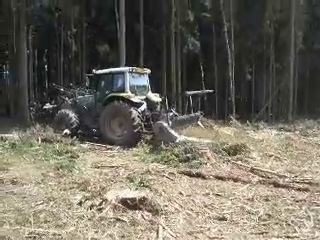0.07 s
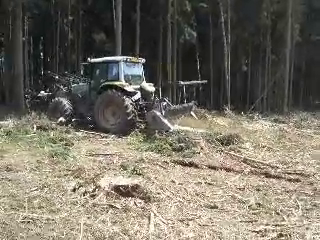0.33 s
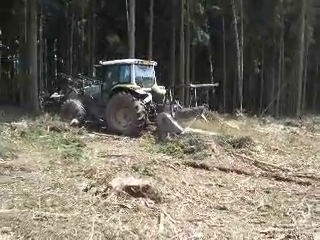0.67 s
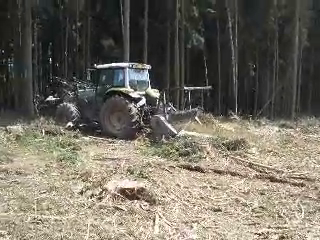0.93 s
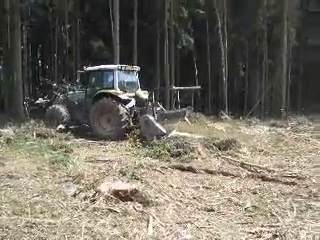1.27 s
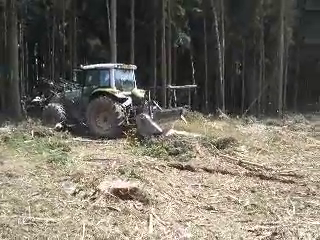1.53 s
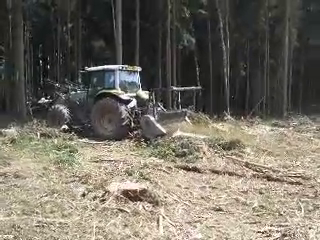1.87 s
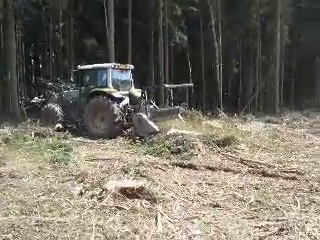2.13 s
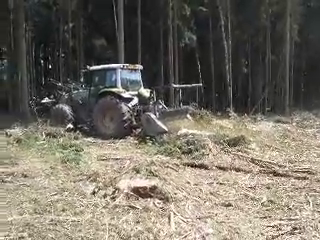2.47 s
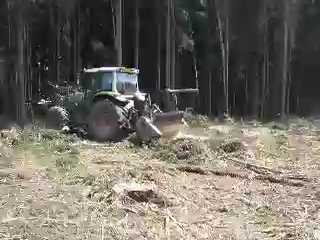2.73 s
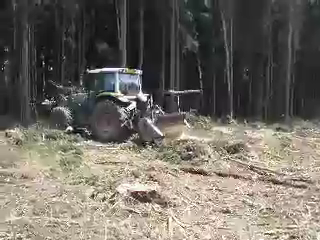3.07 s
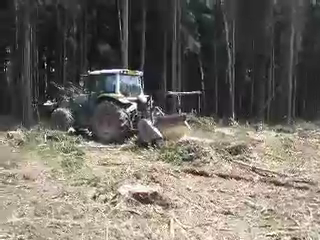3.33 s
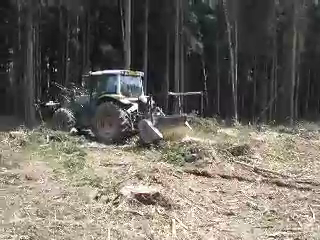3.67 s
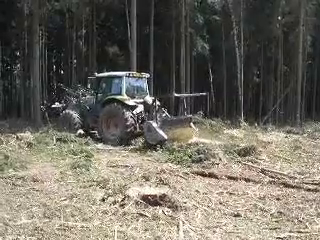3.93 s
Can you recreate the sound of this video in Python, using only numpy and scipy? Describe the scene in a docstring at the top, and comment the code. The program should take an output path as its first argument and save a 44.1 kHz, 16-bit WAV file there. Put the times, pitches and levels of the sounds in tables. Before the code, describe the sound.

A tractor-driven mulcher shreds brushwood throughout, some way off in a clearing: diesel roar, rotor drone and dense splintering. A thick branch snaps at 0.7 seconds; the engine sags slightly until 1.7 and recovers by 3. More loud snaps come at 2.2 and 2.9 seconds. From about 2.5 to 4 seconds the steel hood rings in surges. A narrow-sounding microphone clips the loudest cracks.

```python
"""A tractor drives a forestry mulcher through brushwood, some way off in a clearing.
From the start the six-cylinder diesel roars and the rotor drones, its teeth shredding wood.
A thick branch snaps at 0.7 s; the engine sags under load until 1.7 s and recovers by 3 s.
More loud snaps come at 2.2 and 2.9 s, and towards the end the steel hood rings in surges.
Throughout, a narrow-band camera microphone clips the loudest cracks and ducks after them."""
import sys
import numpy as np
from scipy import signal
from scipy.fft import rfft, irfft
from scipy.io import wavfile

SR = 44100
rng = np.random.default_rng(int(sys.argv[2]) if len(sys.argv) > 2 else 0)


def generate_wav(sig):
    """Save sig (samples, or channels by samples) to the path in sys.argv[1] as 16-bit PCM at SR."""
    pcm = np.round(np.clip(np.atleast_2d(sig).T, -1, 1) * 32767).astype(np.int16)
    wavfile.write(sys.argv[1], SR, pcm)


N = 176400
TIME = np.arange(N) / SR
FREQ_HZ = np.fft.rfftfreq(N, 1 / SR)
EVENT_TIME = TIME[:4096]


def amp(db):
    """Decibels to gain."""
    return 10 ** (np.asarray(db) / 20)


def unit(x):
    """Scales to rms 1."""
    return x / np.sqrt(np.mean(x ** 2) + 1e-20)


def curve(points):
    """Breakpoints to a value per sample."""
    return np.interp(TIME, *np.transpose(points))


def gain_at(spectrum, hz):
    """Gain of a dB spectrum, interpolated in log frequency."""
    f, db = np.transpose(spectrum)
    return amp(np.interp(np.log(hz + 1), np.log(f + 1), db))


def colour(x, spectrum):
    """Filters by a dB spectrum."""
    return irfft(rfft(x) * gain_at(spectrum, FREQ_HZ), N)


def drift(hz):
    """Random wander up to about this rate; rms 1."""
    lowpass = np.exp(-(FREQ_HZ / hz) ** 2) * (FREQ_HZ > 0)
    return unit(irfft(rfft(rng.standard_normal(N)) * lowpass, N))


def add(mix, start_s, sound):
    """Mixes a sound in at a time."""
    part = mix[max(round(start_s * SR), 0):][:len(sound)]
    part += sound[:len(part)]


def partial(cycles, waver_db, waver_rad):
    """A tone whose level and phase wander on the way through the clearing; rms 1."""
    knots_s = np.linspace(0, TIME[-1], 400)
    level, phase = (np.interp(TIME, knots_s, signal.resample(r, 400))
                    for r in rng.standard_normal((2, 24)))
    return unit(amp(waver_db * level) * np.sin(2 * np.pi * (cycles + rng.random()) + waver_rad * phase))


# Shredded wood spectrum: f/Hz, relative density/dB
SHRED_SPECTRUM = [(60, -49.5), (400, -21.5), (650, -9.5), (930, -8), (1180, -2), (1500, -2), (1800, 2),
                  (2150, -1), (2450, 0), (2700, -2.5), (3100, -3), (3300, -3), (3650, -2.5), (4500, -7.5),
                  (5200, -50.5)]
# Shredding envelope: t/s, level/dB
SHRED_LEVEL = [(0, -22.5), (.3, -21), (.8, -22), (1.4, -23), (1.75, -22), (2, -21), (2.3, -22.5),
               (2.85, -20), (3.1, -21.5), (3.4, -22.5), (3.75, -23), (4, -21)]


def shredding(rotor_turns, splinters_per_s=1000, splinter_share=0.74, echo_s=0.0027, echo_db=-1):
    """Teeth tear wood in uneven bites: splinters and chip hiss, which also ring the hood."""
    bite = amp(1.4 * drift(hz=35.4) + 0.66 * drift(hz=2) + 0.75 * np.cos(2 * np.pi * rotor_turns))
    size_db = 3 * np.minimum(rng.exponential(1, N), 2.6)
    clicks = amp(size_db) * rng.choice([-1, 1], N) * (rng.random(N) < splinters_per_s / SR)
    # early echoes off the machine and the ground
    echo_envelope = np.sqrt(abs(signal.fftconvolve(clicks ** 2, np.exp(-EVENT_TIME / echo_s))[:N]))
    splinters = unit(unit(clicks) + amp(echo_db) * unit(echo_envelope * rng.standard_normal(N)))
    hiss = rng.standard_normal(N)
    chips = np.sqrt(splinter_share) * splinters + np.sqrt(1 - splinter_share) * hiss
    wood = unit(colour(bite * chips, SHRED_SPECTRUM))
    wood = 4 * np.tanh(wood / 4)  # soft limit at 4 x rms
    return amp(curve(SHRED_LEVEL)) * wood + hood(bite * echo_envelope)


# Steel hood modes: f/Hz, bandwidth/Hz, relative level/dB
HOOD_MODES = [(1260, 84, 0), (1660, 120, -4.5), (1894, 57, 3), (1990, 70, 0.5), (2460, 55, -5)]
# Ringing envelope: t/s, level/dB
HOOD_LEVEL = [(0, -35.5), (1, -31.5), (2.1, -30.5), (2.35, -31), (2.48, -24), (2.65, -32), (2.84, -20),
              (2.95, -41), (3.4, -21.5), (3.6, -34.5), (3.78, -22), (4, -32)]


def hood(impacts):
    """Flying chips excite the damped modes of the steel hood."""
    t, ringing = EVENT_TIME, 0
    for hz, width_hz, db in HOOD_MODES:
        mode = np.sqrt(width_hz) * np.exp(-np.pi * width_hz * t) * np.cos(2 * np.pi * hz * t)
        ringing += amp(db) * signal.fftconvolve(impacts * rng.standard_normal(N), mode)[:N]
    return amp(curve(HOOD_LEVEL)) * unit(ringing)


# Breaks: t/s, splintering level/dB, snap level/dB, f/Hz, splintering decay/s
CRACKS = [(0.315, -16.5, -19.5, 2300, 0.0062), (0.7111, -7, 1, 2570, 0.0059),
          (0.714, -8.5, -4, 2420, 0.005), (.719, -5, -12.5, 2400, 0.0027), (1.046, -14.5, -14, 1805, .008),
          (1.127, -18, -14, 2000, .006), (1.414, -14.5, -15, 2620, 0.0045), (2.127, -15, -16, 2820, 0.0046),
          (2.1773, -17, -1.5, 2710, 0.021), (2.183, -9.5, -10.5, 2580, .006),
          (2.878, -7.5, 1, 2540, 0.0048), (2.882, -12.5, -7.5, 2380, 0.0055),
          (3.151, -14, -20, 2290, 0.0073), (3.845, -13.5, -14.5, 1900, .008)]


def thick_branches(snap_s=0.00026, rise_s=0.0013):
    """Each branch breaks with a sharp snap and a decaying burst of splintering."""
    out, t = np.zeros(N), EVENT_TIME
    for start_s, burst_db, snap_db, hz, decay_s in CRACKS:
        snap = t / snap_s * np.exp(1 - t / snap_s) * np.sin(2 * np.pi * hz * t)
        burst = splintering(hz) * np.minimum(t / rise_s, 1) * np.exp(-t / decay_s)
        add(out, start_s, amp(snap_db) * snap + amp(burst_db) * burst)
    return out


# Crunches: peak t/s, level/dB, f/Hz, half length/s
CRUNCHES = [(.14, -13.5, 2350, 0.0065), (.345, -21, 3700, 0.0051), (.678, -21.5, 3000, 0.0043),
            (.764, -22, 2900, 0.011), (.99, -18.5, 2420, 0.0079), (1.326, -20, 3370, 0.0063),
            (1.96, -21, 2510, .012), (2.461, -21.5, 2000, 0.013), (2.562, -22.5, 1860, .012),
            (2.826, -23.5, 2054, .012), (2.865, -19, 2290, .006), (3.026, -21, 2630, 0.0093),
            (3.643, -14.5, 1570, .007), (3.711, -20, 1530, 0.011)]


def thin_branches():
    """Each branch is crushed in a short swell of splintering."""
    out, middle_s = np.zeros(N), EVENT_TIME.mean()
    for peak_s, db, hz, half_s in CRUNCHES:
        swell = np.exp(-((EVENT_TIME - middle_s) / half_s) ** 2)
        add(out, peak_s - middle_s, amp(db) * splintering(hz) * swell)
    return out


def splintering(hz, half_width_oct=.65):
    """Fibres tear densely around one pitch, within the microphone band; rms 1."""
    f = np.fft.rfftfreq(len(EVENT_TIME), 1 / SR)
    band = gain_at(MIC_RESPONSE, f) / (1 + (np.log2((f + 1) / hz) / half_width_oct) ** 2)
    fibres = irfft(rfft(rng.standard_normal(len(EVENT_TIME))) * band)
    return unit(np.tanh(unit(fibres)))


# Prominent engine orders: f/crankshaft rate
ENGINE_ORDERS = [3, 4, 4.5, 6, 9, 10.5, 11, 12, 13, 21, 24, 25, 26]
# Per order: level/dB
ORDER_DB = [-56, -66, -53, -51, -55, -51, -56, -58, -52, -44, -35.5, -39.5, -36.5]
# Roar spectrum: f/Hz, relative density/dB
ROAR_SPECTRUM = [(150, -42), (410, -19), (520, -7.5), (620, -3.5), (725, -2), (790, -5.5), (900, -14.5),
                 (1140, -6), (1450, -14), (3000, -17), (4500, -22.5)]
# Roar envelope: t/s, level/dB
ROAR_LEVEL = [(0, -24.5), (.25, -23), (.6, -20), (.78, -22.5), (1.1, -20.5), (1.65, -21.5), (2.1, -21.5),
              (2.35, -27), (2.7, -25.5), (3.0, -27.5), (3.25, -25), (3.37, -34), (3.52, -18.5), (3.68, -27),
              (3.85, -20.5), (4, -26.5)]
# Exhaust spectrum: f/Hz, relative density/dB
RUMBLE_SPECTRUM = [(20, -1), (65, -16), (100, -12.5), (150, -2.5), (200, 1.5), (300, 0), (410, -5),
                   (600, -8), (1000, -18.5)]
# Exhaust envelope: t/s, level/dB
RUMBLE_LEVEL = [(0, -40.5), (.9, -34.5), (1.3, -37.5), (1.7, -32), (2.3, -38), (3.3, -42.5), (3.55, -37.5),
                (4, -32.5)]


def diesel(crank_turns, firings_per_turn=3):
    """Roar and exhaust rumble pulse with each firing; the roar and top orders swell with load."""
    load = amp(curve(ROAR_LEVEL))
    tones = 0
    for order, db in zip(ENGINE_ORDERS, ORDER_DB):
        swell = unit(load) if order > 20 else 1
        tones += amp(db) * swell * partial(order * crank_turns, waver_db=1.5, waver_rad=.2)
    firing = 1 + 0.18 * np.cos(2 * np.pi * firings_per_turn * crank_turns)
    roar = colour(rng.standard_normal(N) * firing * amp(0.5 * drift(hz=14)), ROAR_SPECTRUM)
    rumble = colour(rng.standard_normal(N) * firing, RUMBLE_SPECTRUM)
    return tones + load * unit(roar) + amp(curve(RUMBLE_LEVEL)) * unit(rumble)


# Rotor spectrum: f/Hz, level per harmonic/dB
ROTOR_SPECTRUM = [(70, -84.5), (100, -65.5), (160, -53), (240, -58.5), (350, -53), (480, -46), (600, -45.5),
                  (800, -49.5), (950, -56)]


def rotor(turns, mean_hz):
    """The toothed drum drones on harmonics of its turning rate."""
    return sum(gain_at(ROTOR_SPECTRUM, k * mean_hz) * partial(k * turns, waver_db=2.5, waver_rad=.45)
               for k in range(4, 38))


def whine(hz=1172, level_db=-38):
    """A thin, slightly wavering tone."""
    return amp(level_db) * partial(hz * TIME, waver_db=2.5, waver_rad=0.89)


# Crankshaft rate: t/s, f/Hz
CRANK_RATE = [(0, 29.55), (.6, 29.57), (1, 29.0), (1.35, 29.0), (1.7, 28.5), (2, 29.4), (2.3, 30.08),
              (2.65, 30.72), (3, 30.78), (3.4, 30.38), (4, 30.02)]


def scene(rotor_ratio=.807):
    """Engine and rotor turn at a fixed ratio while branches break; mono."""
    crank_hz = curve(CRANK_RATE)
    crank_turns = np.cumsum(crank_hz) / SR
    rotor_turns = rotor_ratio * crank_turns
    machine = whine() + diesel(crank_turns) + rotor(rotor_turns, rotor_ratio * crank_hz.mean())
    wood = shredding(rotor_turns) + thick_branches() + thin_branches()
    return (machine + wood)[None]


# Microphone response: f/Hz, gain/dB
MIC_RESPONSE = [(20, -28.5), (55, -14), (85, -2), (3600, 1), (3780, 1), (4000, -6.5), (4200, -9),
                (4350, -18), (4500, -29), (4700, -61.5), (5200, -99.5)]
# Treble dip after clipping: f/Hz, gain/dB
OUTPUT_RESPONSE = [(20, 0), (4400, -0.5), (5500, -5.5), (8000, -11), (15000, 1.5)]


def record(dry, threshold_db=-16, max_duck_db=5.5, recover_db_per_s=136.5, lag_s=.004,
           clip_level=.72, cutoff_hz=15800):
    """Narrow microphone band, gain control that reacts a moment late, hard clipping, band limit."""
    x = colour(dry[0], MIC_RESPONSE)
    power_db = 10 * np.log10(signal.lfilter(np.ones(220) / 220, 1, x ** 2) + 1e-9)  # 5 ms mean
    over_db = np.clip(power_db - threshold_db, 0, max_duck_db)
    recovery_db = TIME * recover_db_per_s
    held_db = np.maximum.accumulate(over_db + recovery_db) - recovery_db
    pole = np.exp(-1 / (lag_s * SR))
    duck_db = signal.lfilter([1 - pole], [1, -pole], held_db)
    clipped = np.clip(x * amp(-duck_db), -clip_level, clip_level)
    lowpass = signal.firwin(511, cutoff_hz, window=("kaiser", 9), fs=SR)
    return signal.oaconvolve(colour(clipped, OUTPUT_RESPONSE), lowpass, "same")[None]


dry = scene()
out = record(dry)
generate_wav(out)
```